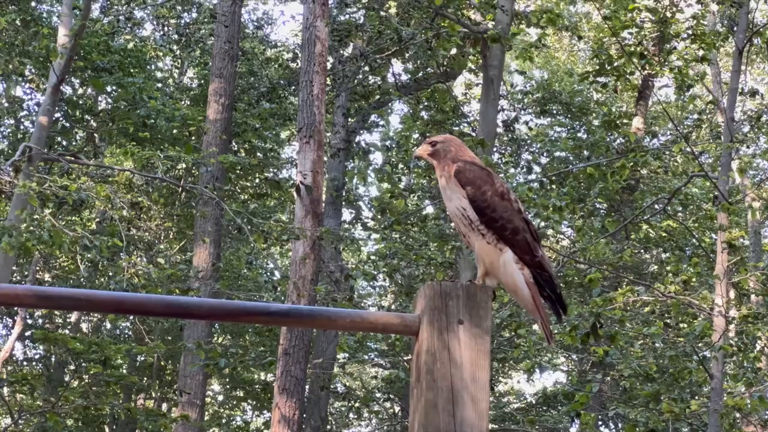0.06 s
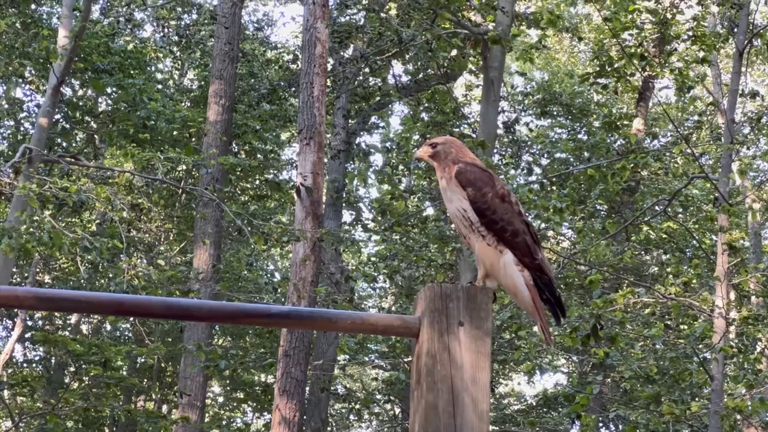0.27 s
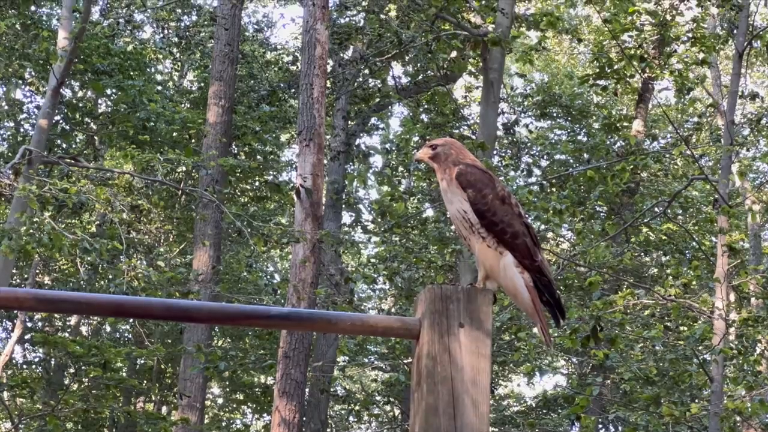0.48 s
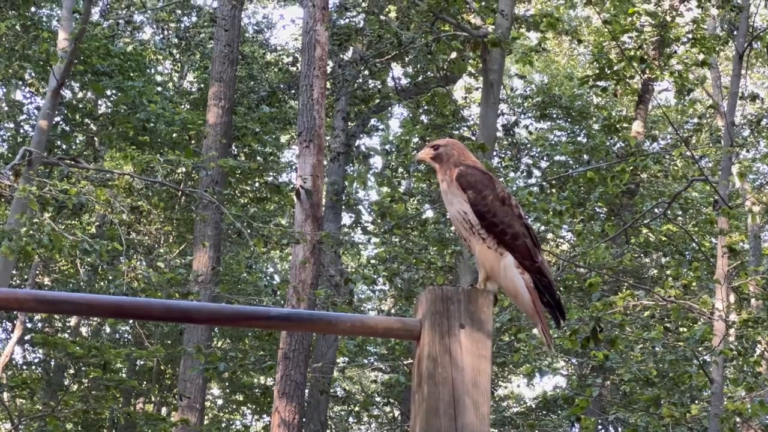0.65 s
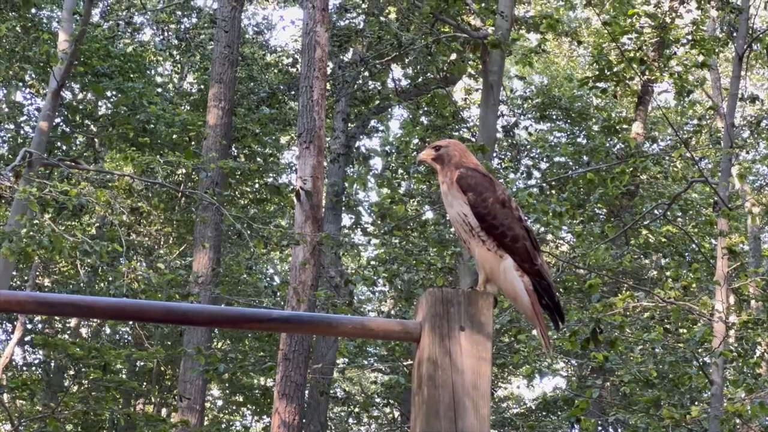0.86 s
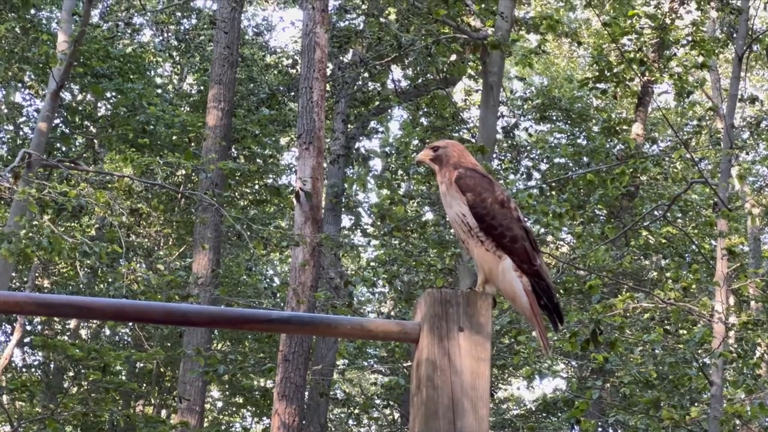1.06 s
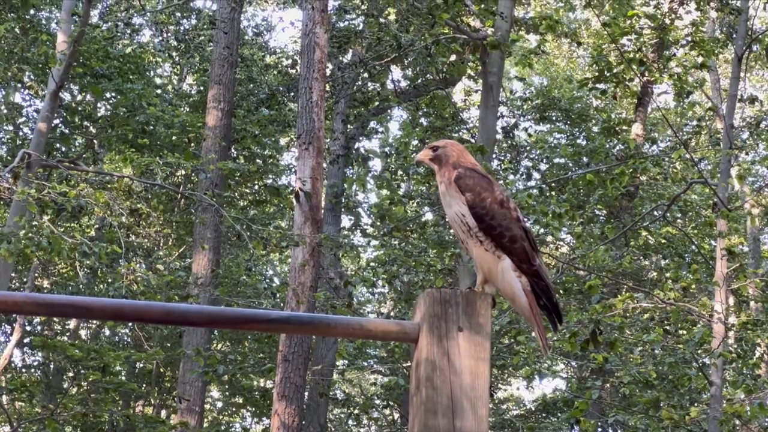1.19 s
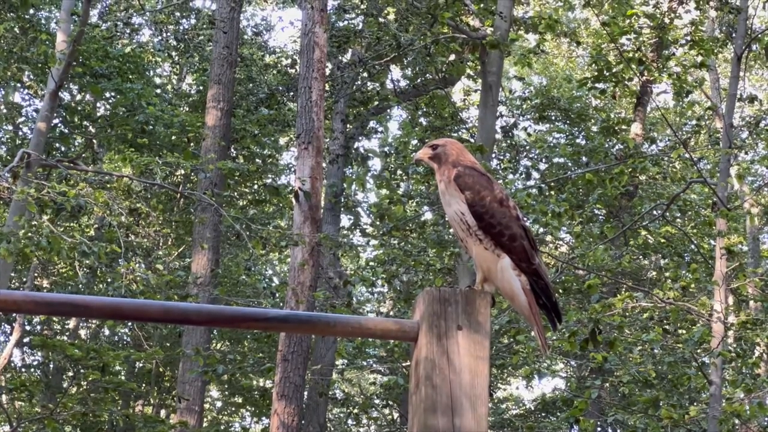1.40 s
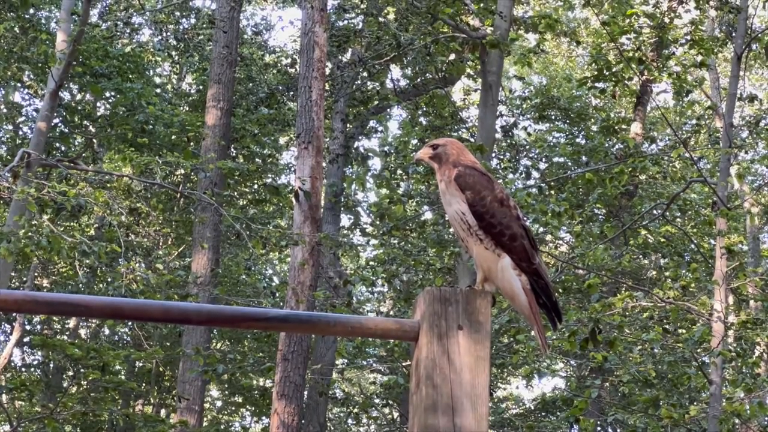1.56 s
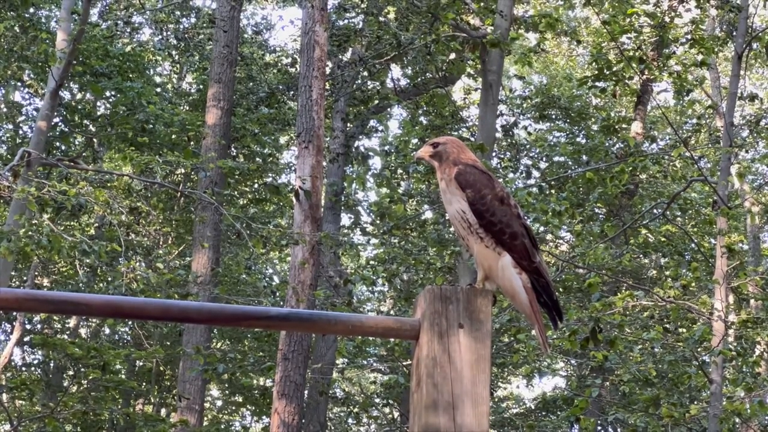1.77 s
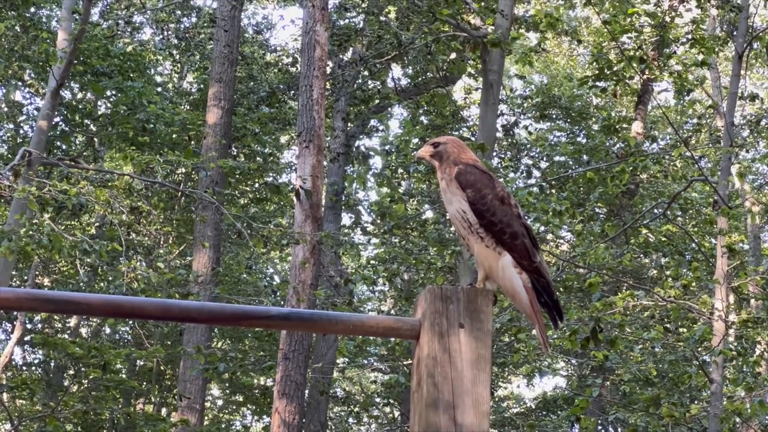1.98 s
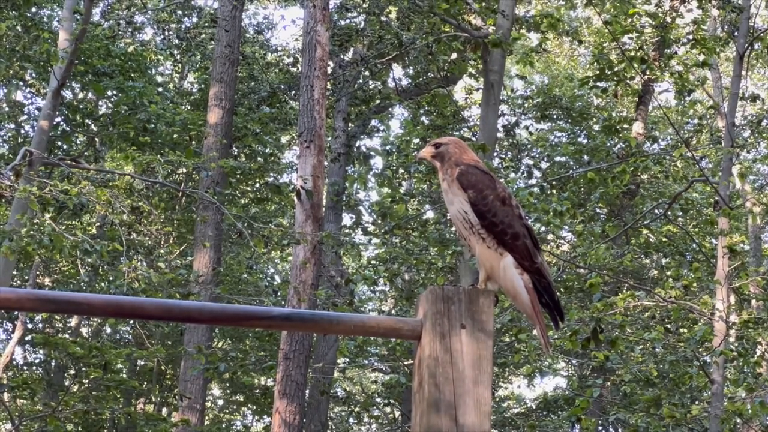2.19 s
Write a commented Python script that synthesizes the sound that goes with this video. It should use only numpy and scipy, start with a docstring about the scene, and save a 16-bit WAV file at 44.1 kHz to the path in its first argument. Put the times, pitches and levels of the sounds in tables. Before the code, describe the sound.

A hawk squawks twice from a few metres away in woodland, with a pause between the calls. Each short, hoarse cry turns raspy and leaves a thin echo among the trees, over a faint distant rumble.

```python
"""Two hoarse squawks from a red-tailed hawk a few metres away in woodland.
Each opens harshly, clears to a reedy tone, then rasps as a slow second vibration joins in the syrinx
and the pitch sags. The trees return a long thin echo. Behind it: a low distant rumble and hum,
a far bird's note, a faint rising whistle and a soft tap."""
import sys
import numpy as np
from scipy import signal
from scipy.fft import rfft, irfft
from scipy.io import wavfile
from scipy.ndimage import uniform_filter1d

SR = 44100
rng = np.random.default_rng(int(sys.argv[2]) if len(sys.argv) > 2 else 0)


def master_out(mix):
    """Clip the mix to full scale and print it as 16-bit PCM to the path in sys.argv[1]."""
    frames = np.transpose(np.atleast_2d(mix))
    ceiling = np.clip(frames, -1, 1)
    pcm = np.round(ceiling * 32767).astype(np.int16)
    wavfile.write(sys.argv[1], SR, pcm)


N = 99225
T = np.arange(N) / SR
FREQS = np.arange(N + 1) * SR / (2 * N)


def undb(db):
    """Decibels to gain."""
    return 10 ** (np.asarray(db) / 20)


def unit(x):
    """Scale to rms 1."""
    return x / np.sqrt(np.mean(x ** 2))


def curve(rows, column=1):
    """Table column interpolated over time."""
    rows = np.array(rows)
    return np.interp(T, rows[:, 0], rows[:, column])


def across(rows):
    """Table interpolated over log frequency."""
    rows = np.array(rows)
    return np.interp(np.log(FREQS + 1), np.log(rows[:, 0]), rows[:, 1])


def shape(x, gain):
    """Filter by a gain per frequency."""
    return irfft(rfft(x, 2 * N) * gain)[..., :N]


def below(hz, order=40):
    """Low-pass gain."""
    return 1 / (1 + (FREQS / hz) ** order)


def wander(hz):
    """Random motion up to about hz, rms 1."""
    return unit(shape(rng.standard_normal(N), below(hz, order=4)))


def decay(age_s, t60_s):
    """Exponential fade, 60 dB per t60_s."""
    return np.exp(-np.log(1000) * age_s / t60_s)


def background():
    """Distant, slightly throbbing rumble under faint forest hush."""
    # noise spectrum (frequency [Hz], relative density [dB])
    spectrum = [(15, -71), (25, -31.5), (49, -8.5), (71, -5), (116, -7), (148, -17), (183, -14.5),
                (240, -20.5), (331, -26), (421, -27), (703, -35), (1240, -42), (3170, -50), (3630, -58),
                (7500, -62), (15500, -83)]
    # stereo width (frequency [Hz], side minus mid [dB])
    width = [(60, -22.5), (110, -17), (200, -6.5), (380, -8.5), (700, -0.5), (1290, -2), (2380, -16.5)]
    level_db, throb_db = -53, 0.91
    colour = undb(across(spectrum))
    mid = shape(rng.standard_normal(N), colour)
    side = shape(rng.standard_normal(N), colour * undb(across(width)))
    return np.array([mid + side, mid - side]) / np.std(mid) * undb(level_db + throb_db * wander(13))


def drone():
    """Narrow-band throbbing hum, as of far machinery or traffic."""
    centre_hz, width_hz, level_db = 66.6, 12, -56.5
    peak = 1 / (1 + ((FREQS - centre_hz) / width_hz) ** 2) ** 2
    return undb(level_db) * unit(shape(rng.standard_normal(N), peak))


def far_bird():
    """One short, faint, wavering note."""
    centre_s, half_width_s, pitch_hz, level_db = .79, 0.055, 1370, -77.5
    tone = unit(np.sin(2 * np.pi * pitch_hz * T + 0.9 * wander(53)))
    return tone * undb(level_db) * np.exp(-((T - centre_s) / half_width_s) ** 2)


def whistle():
    """Thin wavering tone creeping upward before the second call."""
    # glide (time [s], pitch [Hz], level [dB])
    glide = [(1.42, 1012, -83), (1.56, 1075, -79.5), (1.6, 1098, -68.5), (1.64, 1108, -74),
             (1.7, 1180, -74), (1.715, 1230, -100)]
    pitch_hz = curve(glide) * (1 + 0.01224 * wander(80))
    tone = unit(np.sin(2 * np.pi * np.cumsum(pitch_hz) / SR))
    gate = (T > glide[0][0]) & (T < glide[-1][0])
    return gate * undb(curve(glide, column=2)) * tone


def tap():
    """Soft dull tap: a burst of low-passed noise."""
    start_s, attack_s, t60_s, level_db = 2.126, 0.00084, 0.023, -54.5
    noise = unit(shape(rng.standard_normal((2, N)), below(2500, order=4)))
    age_s = np.maximum(T - start_s, 0)
    return noise * undb(level_db) * np.minimum(age_s / attack_s, 1) * decay(age_s, t60_s)


def woodland_echo(x):
    """Scatter from near trunks plus a long tail from the trees beyond, different per channel."""
    # echo tail (band centre [Hz], level [dB], t60 [s])
    bands = [(800, -21.5, 1), (1540, -17, 0.59), (2350, -16, 1.3), (2720, -15, .95), (3090, -19, 1.205),
             (3800, -17, .85), (5740, -15.5, 0.61), (8140, -19.5, 0.36)]
    delay_s, build_s, crossfeed = 0.0089, 0.019, 0.55
    near_db, near_t60_s = -16, 0.21
    age_s = np.maximum(T - delay_s, 0)
    build = 1 - np.exp(-age_s / build_s)
    response = 0
    for hz, db, t60_s in bands:
        share = across([(row[0], float(row[0] == hz)) for row in bands])
        noise = shape(rng.standard_normal((2, N)), np.sqrt(share))
        response += undb(db) * unit(build * decay(age_s, t60_s)) * noise
    near = (age_s > 0) * decay(age_s, near_t60_s)
    response += undb(near_db) * unit(near) * rng.standard_normal((2, N))
    response = response + crossfeed * response[::-1]
    return signal.fftconvolve(x[None], response / np.sqrt(N), axes=1)[:, :N]


def harmonics(phase, rasp_phase, rasp, count):
    """Flickering harmonics; the rasp cycle adds lopsided sidebands, less regular towards the top."""
    # rasp throttling of harmonics 1-5, then all higher (depth [0-1], lead over pitch swing [rad])
    throttling = [(.12, 0), (.45, -1.3), (.65, 1.3), (.33, 1.3), (.5, .6), (.5, .3)]
    scatter_rad, stray_rad, swing_rad, flicker_db = 1.01, .085, .21, 2.1
    flicker, stray = wander(42), wander(97)
    out = 0
    for k in range(1, count + 1):
        depth, lead_rad = throttling[min(k, len(throttling)) - 1]
        lag = scatter_rad * rng.standard_normal() + stray_rad * k * np.roll(stray, rng.integers(N))
        gain = undb(flicker_db * np.roll(flicker, rng.integers(N)))
        throttle = 1 + depth * rasp * np.cos(rasp_phase + lag + lead_rad)
        swing = swing_rad * rasp * np.cos(rasp_phase + lag)
        out += gain * throttle * np.cos(k * (phase + swing) + rng.uniform(0, 2 * np.pi))
    return out


def syrinx(pitch_hz, rough, rasp):
    """Jittery tone with hiss once a cycle; a second vibration shakes the tone and slows as it deepens."""
    settled_hz, speedup_hz, settled_depth = 130, 70.83, .75
    jitter_rad, jitter_hz, shimmer, hiss_db = 0.323, 333.7, 0.35, -6.5
    rasp_hz = settled_hz + speedup_hz * np.clip(1 - rasp / settled_depth, 0, 1)
    rasp_phase = 2 * np.pi * np.cumsum(rasp_hz * (1 + .04 * wander(55))) / SR
    phase = 2 * np.pi * np.cumsum(pitch_hz * (1 + 0.0012 * wander(70))) / SR
    phase += jitter_rad * rough * wander(jitter_hz)
    tone = unit(harmonics(phase, rasp_phase, rasp, count=20))
    noise = shape(rng.standard_normal(N), 1 - below(2000, order=6))
    hiss = undb(hiss_db) * rough * (1 + .7 * np.cos(phase)) * noise
    return (tone + hiss) * np.exp(shimmer * rough * wander(290))


def squawk(span_s, pitch, quality, upper_hz, levels):
    """One call: the syrinx through the throat, whose bands swell and fade as the beak moves."""
    # throat colour (frequency [Hz], relative gain [dB])
    colour = [(600, -42.5), (780, -16), (960, -39), (1200, -2), (1390, -8.5), (1590, -6), (1860, -11.5),
              (2050, -9.5), (2350, -17), (2650, -7.5), (3080, -1.5), (3450, -10), (3950, -16.5),
              (4400, -22), (4900, -18), (5200, -22), (6350, -12.5), (6800, -17.5), (8000, -21.5),
              (8800, -28), (9700, -28), (10550, -40), (11400, -25.5), (12600, -30), (13900, -48)]
    # throat bands (edge [Hz])
    edges_hz = [550, 1050, 1900, 2600, 3500, 4400, 5250, 5950, 7000, 16000]
    attack_s, release_s, upper_width_hz, upper_db = .004, 0.0072, 550, 8.5
    start_s, end_s = span_s
    gate = np.clip((T - start_s) / attack_s, 0, 1) * np.clip((end_s - T) / release_s, 0, 1)
    source = syrinx(curve(pitch), rough=curve(quality), rasp=curve(quality, column=2))
    resonance_db = upper_db * np.exp(-((FREQS - upper_hz) / upper_width_hz) ** 2)
    throat = undb(across(colour) + resonance_db)
    out = 0
    for column, (low_hz, high_hz) in enumerate(zip(edges_hz, edges_hz[1:]), start=1):
        band = shape(source, throat * (below(high_hz) - below(low_hz)))
        running_rms = np.sqrt(uniform_filter1d(band ** 2, size=1100) + 1e-12)
        out += band / running_rms * undb(curve(levels, column))
    return out * gate


def hawk():
    """Two squawks, each harsh, then reedy, then rasping."""
    # calls (start [s], end [s])
    spans_s = [(.218, 0.4717), (1.697, 1.965)]
    # syrinx pitch per call (time [s], pitch [Hz])
    pitches = [
        [(.218, 589.6), (.224, 666), (.231, 810), (.243, 799.3), (.268, 830.3), (.281, 828), (.293, 796.5),
         (.335, 785.3), (.372, 775.6), (.41, 757.2), (.437, 751.4), (.449, 705.2), (.475, 715.5)],
        [(1.698, 597), (1.707, 627), (1.713, 802), (1.732, 800), (1.747, 833), (1.762, 800.5), (1.783, 780.7),
         (1.85, 772.8), (1.895, 755.8), (1.925, 753), (1.94, 718), (1.965, 743)],
    ]
    # voice quality per call (time [s], roughness [0-1], rasp depth [0-1])
    qualities = [
        [(.218, 0.94, 0), (.235, 0.36, 0), (.255, 0.46, 0.11), (.272, 0, 0.06), (.325, 0.01, .22),
         (.355, 0.23, 1), (.43, 0.13, .85), (.45, 0.5, 0.65), (.474, 0.5, 0.6)],
        [(1.698, 1, 0), (1.718, .33, 0), (1.735, 0.38, 0.15), (1.752, 0.18, 0.04), (1.78, 0, 0.23),
         (1.83, 0.21, 0.78), (1.935, 0.13, .75), (1.962, 0.2, 0.8)],
    ]
    # upper throat resonance per call (centre [Hz])
    upper_hz = [5720, 6030]
    # throat bands per call (time [s], level of each of nine bands, low to high [dB])
    levels = [
        [(0.222, -64, -57, -65, -49.5, -57, -52.5, -59, -51.5, -53),
         (0.238, -73, -54, -53.5, -55, -40.5, -57, -56, -60, -47.5),
         (0.252, -61.5, -50, -57, -46.5, -41.5, -53, -53, -46, -53.5),
         (0.272, -55.5, -59, -66, -61, -49.5, -40, -56, -78, -58),
         (0.298, -63.5, -48, -51, -36.5, -44.5, -50.5, -50, -40.5, -51),
         (0.34, -62.5, -52.5, -52.5, -36.5, -48, -55.5, -59, -61, -57),
         (0.362, -58, -53, -51.5, -39.5, -49, -49.5, -46, -60, -55.5),
         (0.432, -60, -60.5, -52, -34, -49.5, -63.5, -45.5, -56, -55.5),
         (0.456, -66, -53.5, -55, -41.5, -56.5, -56, -59, -61, -64.5),
         (0.47, -70, -54, -63, -38, -48, -69, -50, -51, -53.5)],
        [(1.702, -69, -55.5, -62.5, -58, -56, -56, -64, -56.5, -61.5),
         (1.712, -66, -61, -55, -59, -47, -57, -59, -57, -54.5),
         (1.722, -75, -49.5, -58, -45, -43, -57, -57, -56, -54),
         (1.735, -60, -54.5, -55, -47, -41.5, -51.5, -56, -56, -54),
         (1.751, -59, -56, -65, -67, -57.5, -51.5, -69, -58, -66),
         (1.764, -62, -51.5, -55, -48, -46.5, -41.5, -70, -53, -59),
         (1.782, -60, -53, -61, -48.5, -52.5, -64, -68, -60, -56),
         (1.81, -61.5, -53.5, -61, -56, -51, -53.5, -57.5, -53, -58.5),
         (1.836, -60, -52.5, -59.5, -41.5, -48.5, -51.5, -67, -55, -57),
         (1.884, -59, -55.5, -54, -37.5, -49.5, -53.5, -49, -69, -59),
         (1.924, -61, -60.5, -54.5, -38.5, -58, -58.5, -55, -59, -62),
         (1.958, -76, -63.5, -59, -43.5, -53.5, -77, -57, -72, -64)],
    ]
    return sum(squawk(*call) for call in zip(spans_s, pitches, qualities, upper_hz, levels))


def scene():
    """The hawk at two microphone ports, its echo and the background."""
    # phase between ports (frequency [Hz], left lead [rad])
    port_phase = [(1900, 0), (2900, -.68), (4200, -.48), (6600, 0), (8400, -.5), (9000, .2), (10500, 3.1),
                  (12000, 6.1), (13800, 9.2)]
    calls = hawk()
    lead = np.exp(1j * across(port_phase) / 2)
    direct = np.array([shape(calls, lead), shape(calls, lead.conj())])
    return direct + woodland_echo(calls) + whistle() + tap() + far_bird() + drone() + background()


def record(dry):
    """The recorder's steep low-pass."""
    cutoff_hz = 15800
    return signal.sosfilt(signal.ellip(8, .2, 70, cutoff_hz, fs=SR, output="sos"), dry)


dry = scene()
out = record(dry)
master_out(out)
```